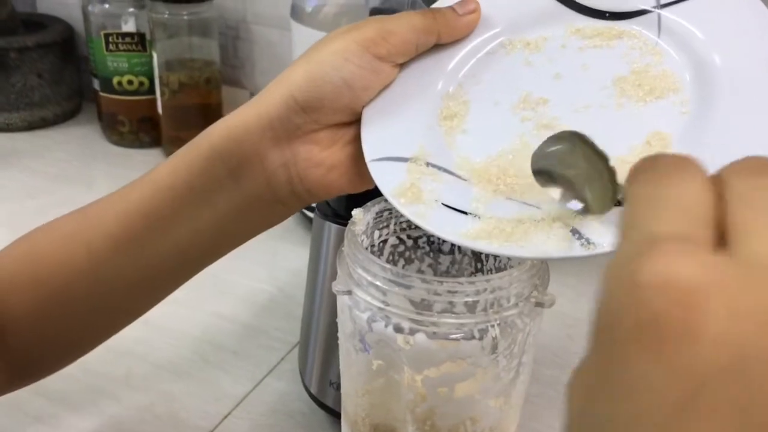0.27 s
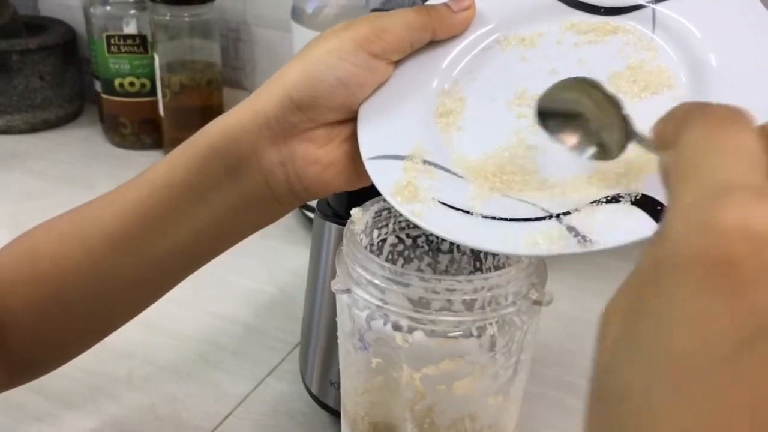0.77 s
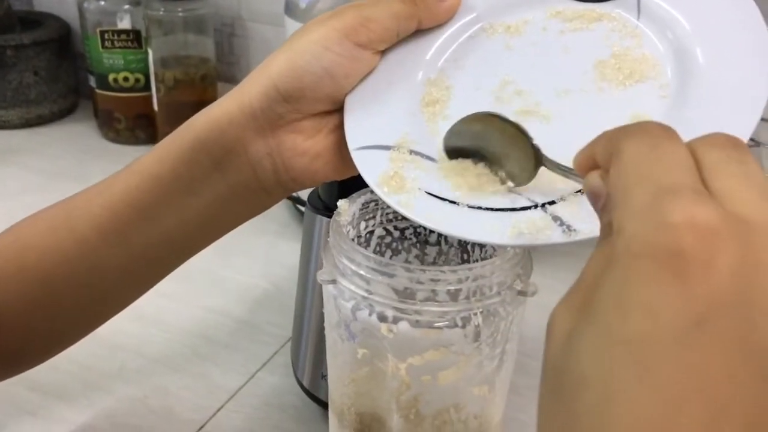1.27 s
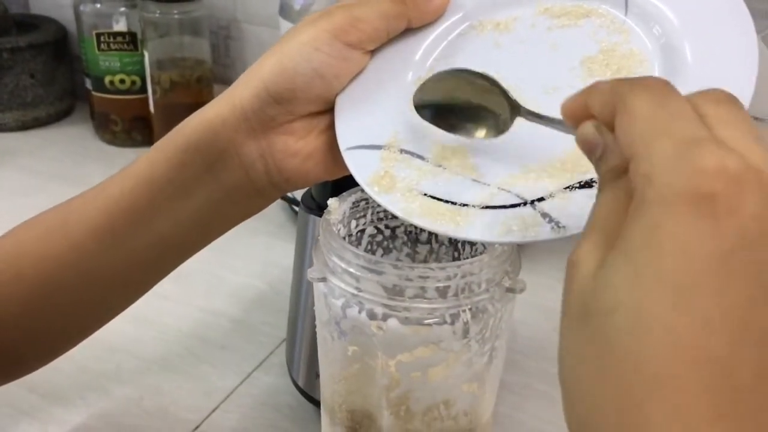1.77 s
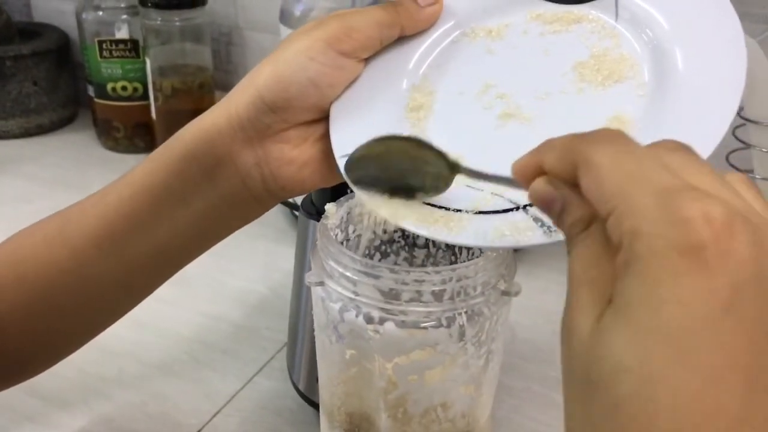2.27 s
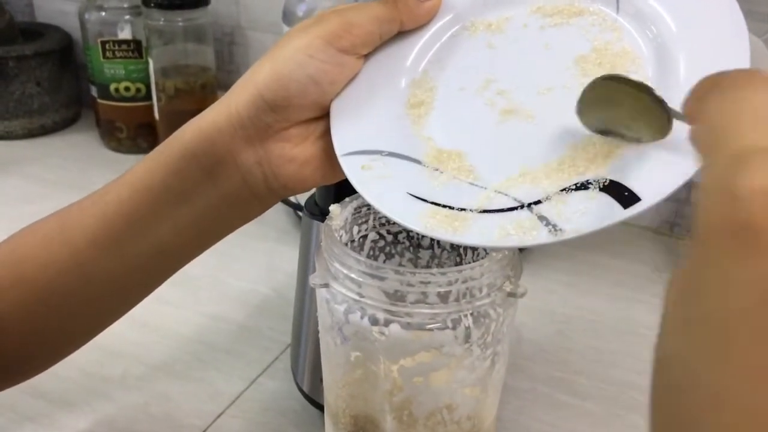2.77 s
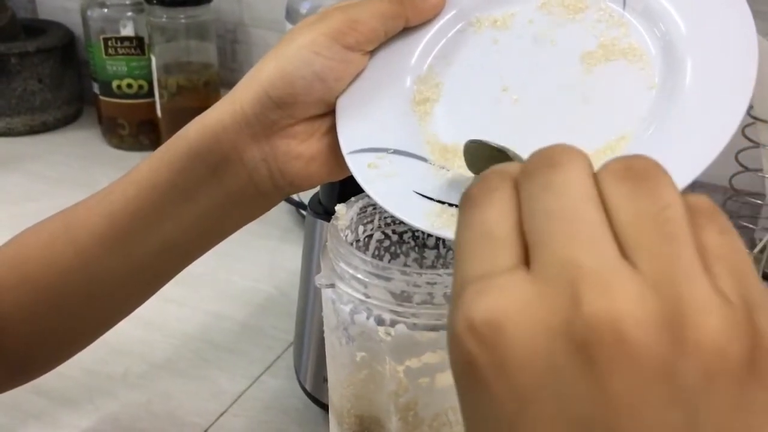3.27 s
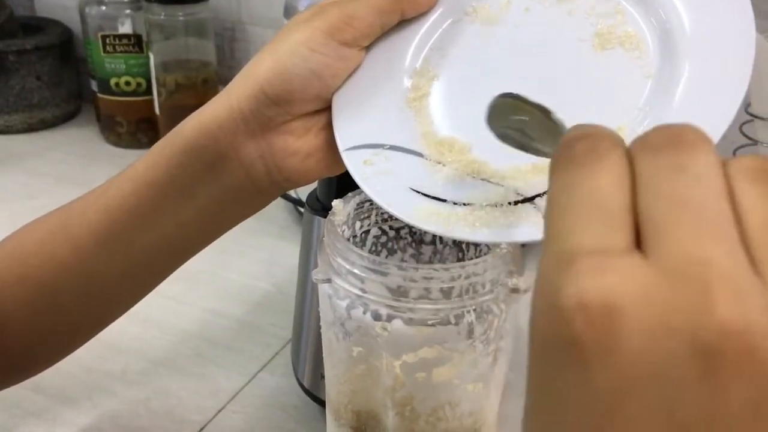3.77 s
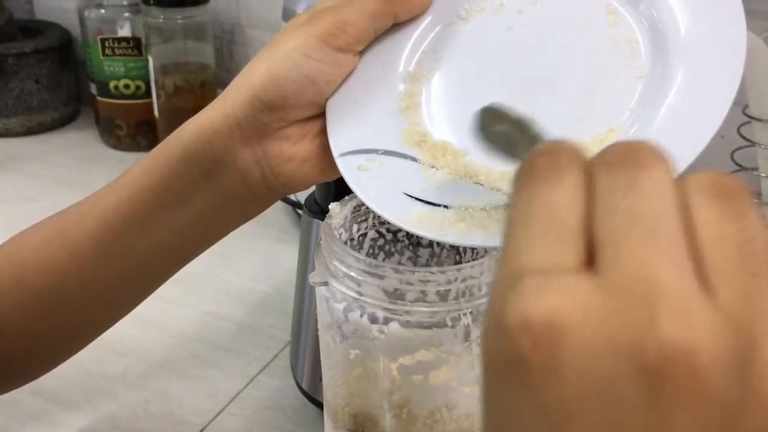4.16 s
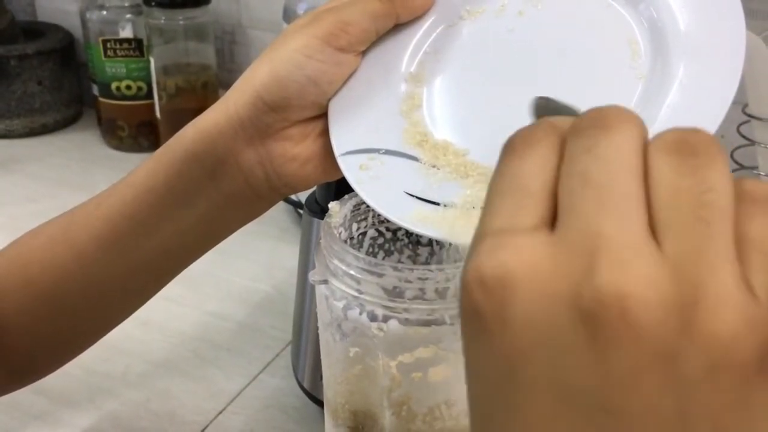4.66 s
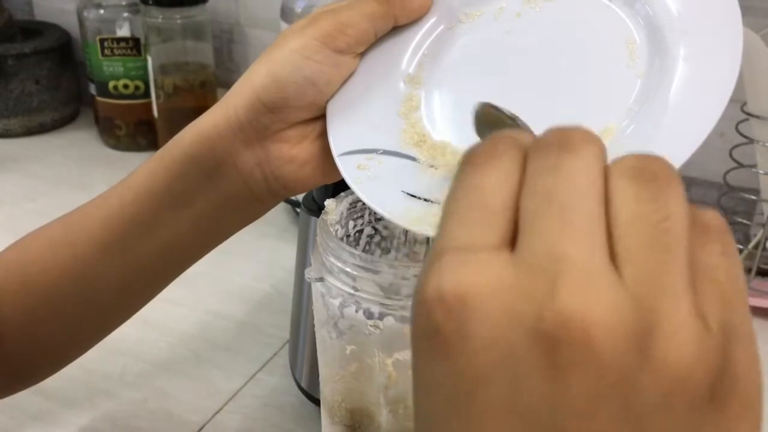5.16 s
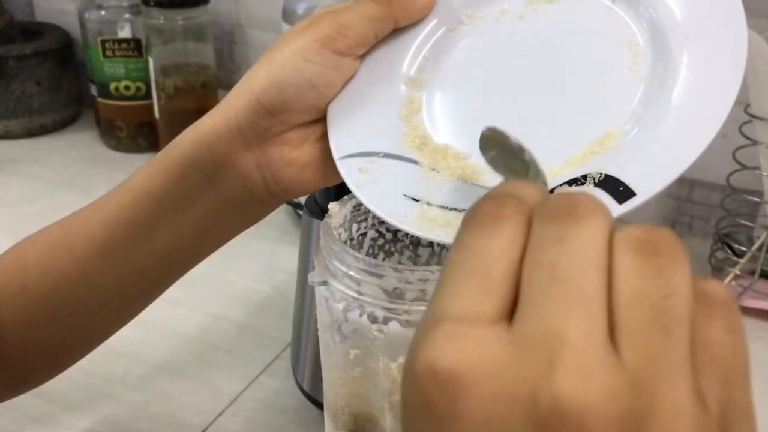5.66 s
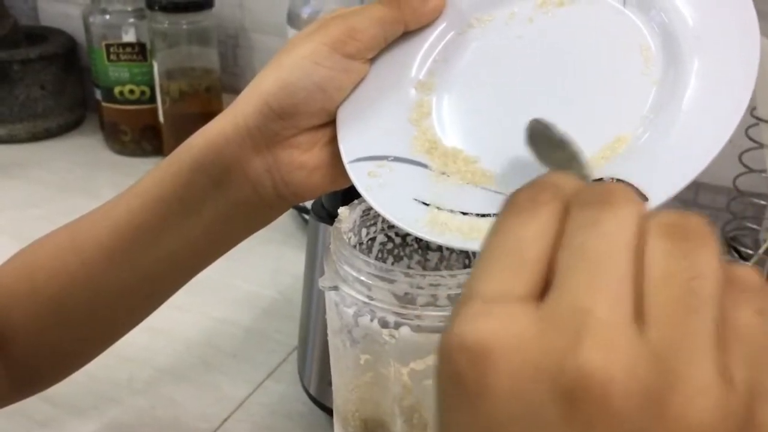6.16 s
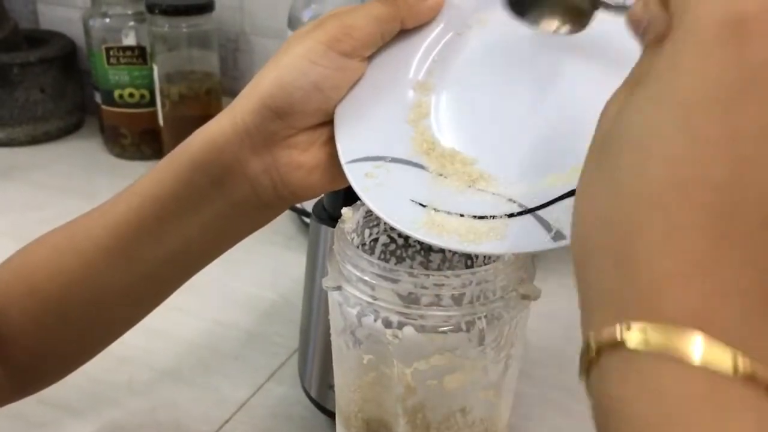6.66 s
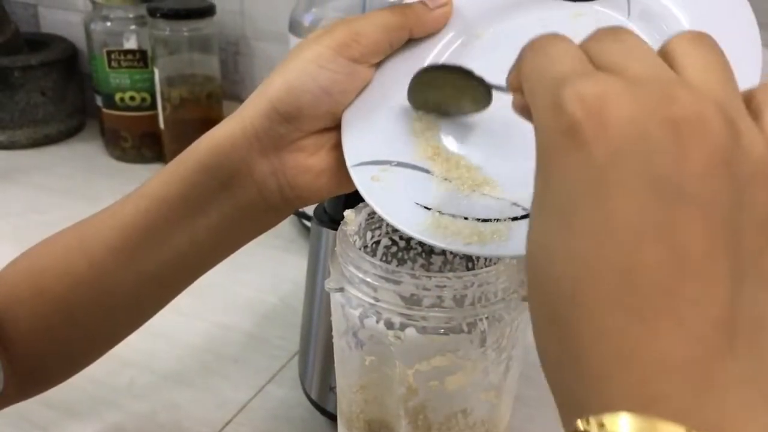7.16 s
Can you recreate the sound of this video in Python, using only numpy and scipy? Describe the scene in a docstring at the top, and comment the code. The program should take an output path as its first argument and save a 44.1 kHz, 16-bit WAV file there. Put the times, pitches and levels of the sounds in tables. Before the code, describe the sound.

Irregular bright spoon clinks and dull plate knocks mix with short grainy scrapes and faint ticking sugar crystals, close up in a lively kitchen.

```python
"""A dull knock and a short clink come first, over low rumble and hiss: a steel spoon pushes sugar off a
hand-held ceramic plate into a blender jar, in a quiet, hard-walled kitchen.
Clinks excite damped modes and a dense crack; scrapes are showers of grain blows, squeaks gliding resonances.
Crystals tick into the jar. The hands damp spoon and plate, so most of the ring that lingers is the room,
made of decaying bands of noise."""
import sys
import numpy as np
from scipy import signal
from scipy.fft import rfft, irfft, next_fast_len
from scipy.io import wavfile

SR = 44100
rng = np.random.default_rng(int(sys.argv[2]) if len(sys.argv) > 2 else 0)


def master(y):
    """Save y as 16-bit WAV."""
    cut = np.clip(np.atleast_2d(y).T, -1, 1)
    pcm = np.round(cut * 32767)  # scale
    wavfile.write(sys.argv[1], SR, pcm.astype(np.int16))


N = 326340
RING = np.arange(int(.1 * SR)) / SR   # time axis of one blow, in seconds

# spoon meets plate: flat it knocks, on edge it ticks; its spot trades a low clack for a high ting; # a few
# faint rows are sugar grains ticking into the jar: start_s, strength_db, knock_db, edge_db, ting_db
TAPS = [(0.1528, 5, 16, 4.5, -11), (0.3199, -12, 11, -6, 3), (0.4059, -7, 15, -5, -5),
        (0.4209, 5, -3.5, -17, -6), (0.602, -30.5, -7, 19, -6), (0.689, -25, -5, 15, 12),
        (0.8055, 24, -8.5, -1.5, 4.5), (0.831, 16, -13.5, -2.5, 6), (1.0224, -11.5, -10, 13, 5),
        (1.2583, -14.5, 6.5, 2, -9), (1.8255, 20.5, -9, -2, 1), (2.0139, 21, -10.5, -5.5, -3.5),
        (2.0329, 6.5, 9.5, -15, -12), (2.044, 9.5, 4.5, -3, -23), (2.2039, -5, 16.5, -13, -4),
        (2.6901, -5.5, 22, -3, -0.5), (2.7269, -2.5, 22, -7, -5.5), (2.7357, 4, 11.5, -9, -12),
        (2.7576, 0, 8.5, -8, 3), (2.7809, 18, -9, -4, 8.5), (2.9163, -16.5, 19, 14, -9),
        (2.963, -5.5, -10, -2, 8.5), (3.015, 6, -5, -5, 2.5), (3.094, -1, 4, 7.5, 7),
        (3.1126, -4, 7, 2, -11.5), (3.1986, 1, -3, 12, 4.5), (3.382, 1, -12, -7, -7),
        (3.4752, 14, -13, -15, -2.5), (3.877, -5.5, 17, 18.5, 3), (3.981, -11, 7, 13.5, -7),
        (4.2904, 9.5, 0, -8.5, -4.5), (4.3415, -3.5, 15, 5, -12), (4.3543, 16, -1, -26, -11),
        (4.359, 16, -6.5, 1, 6), (4.586, -17.5, 0, 10.5, -4), (4.6573, 12.5, 0, -1.5, 2.5),
        (4.754, 0.5, -15, -11, -17), (4.8204, -8.5, 10, -9.5, 4), (4.8767, -18, 0, 17.5, 3),
        (5.205, -9.5, 21.5, 0.5, -1), (5.4268, -10.5, -4.5, 7, -6), (5.6496, -0.5, 12, 4.5, 3),
        (6.0233, 0, 9.5, -17, 6.5), (6.0348, 6.5, 7, -0.5, -6), (6.2052, -15, 23, 14, -1),
        (6.2488, -5.5, 16.5, 6, -2.5), (6.382, -14.5, 0.5, 2.5, -2), (6.6923, 4, 13, -2, -6.5),
        (6.7047, 9, -0.5, 0.5, 8.5), (6.7998, 0.5, 17.5, 12, -14), (6.8032, 9, 1, 12, 5),
        (6.8106, 13, -4, 8, 3.5), (6.9647, 6, -4.5, -2, -5), (7.056, -0.5, 3.5, 4.5, -2)]
# how far each side of a contact reaches over the spectrum: pitch_hz, share
KNOCK_REACH = [(280, 0.85), (400, 1), (1000, 0.95), (2500, 0.47), (3900, 0.076), (5600, 0.16), (13800, .1)]
EDGE_REACH = [(3900, .02), (5600, 0.46), (9200, 0.84), (13800, 1)]
TING_REACH = [(1300, 0.16), (2500, -0.68), (3900, 0.027), (5600, .8), (9200, -0.095)]
# colour of an ordinary tap: pitch_hz, level_db
PLAIN_CONTACT = [(280, -6.5), (1000, -2), (3900, -1.25), (9200, -0.5), (13800, -4)]
# pitches at which the colour of a contact is set: pitch_hz
COLOUR_HZ = np.array([280, 400, 1000, 1300, 2500, 3900, 5600, 9200, 13800])


def taps(level_db=1.5):
    """Clinks and bounces, and a few faint grain ticks: each blow is coloured by how and where it lands."""
    out = np.zeros(N)
    for start_s, strength_db, knock_db, edge_db, ting_db in TAPS:
        contact_db = at_hz(PLAIN_CONTACT, COLOUR_HZ)
        contact_db = contact_db + knock_db * at_hz(KNOCK_REACH, COLOUR_HZ)
        contact_db = contact_db + edge_db * at_hz(EDGE_REACH, COLOUR_HZ)
        contact_db = contact_db + ting_db * at_hz(TING_REACH, COLOUR_HZ)
        clink = coloured(body(), list(zip(COLOUR_HZ, contact_db)))
        add(out, start_s, from_db(strength_db + level_db) * clink)
    return out


# modes of spoon and plate together: pitch_hz, width_hz, peak_db
MODES = [(178, 4.8, -16), (393, 106, -17.5), (602, 47, -14.5), (839.4, 56, -13.5), (1205, 88, -15.5),
         (1221, 99, -28), (1335, 48, -20), (1396, 130, -19), (2310, 72, -32.5), (2520, 68, -15),
         (2596, 5.2, -9.5), (3246, 91, -19), (3633, 57, -13.5), (3829, 66, -9), (4007, 87, -6.5),
         (5273, 24, -31.5), (5504, 260, -11), (5528, 38.5, -11), (6030, 280, -26.5), (6180, 630, -20),
         (7925, 85, -16.5), (8830, 54, -37), (8730, 87, -11.5), (9870, 83, -25), (11880, 200, -18.5),
         (12494, 50, -17.5), (14500, 270, -24), (15700, 222, -36.5)]


def body(spread_db=2.35, detune=0.0039, contact_s=0.0001):
    """One blow on spoon and plate: each spot weighs the modes anew, and the grip shifts them a little."""
    pitch_hz, width_hz, peak_db = np.transpose(MODES)[:, :, None]
    weight, shift = rng.standard_normal((2, len(MODES), 1))
    turns = pitch_hz * (1 + detune * shift) * RING + rng.random((len(MODES), 1))
    # a wide mode dies sooner, so it starts higher to reach its spectral peak
    height = 2 * np.pi * width_hz / SR * from_db(peak_db + spread_db * weight)
    modes = height * np.exp(-np.pi * width_hz * RING) * np.sin(2 * np.pi * turns)
    build_up = 1 - np.exp(-RING / contact_s)
    return (modes.sum(axis=0) + crack()) * build_up


# colour of the dense, heavily damped modes: pitch_hz, level_db
CRACK = [(100, -68), (170, -42.5), (330, -19.5), (480, -47), (620, -22), (1450, -21.5), (1900, -22.5),
         (2900, -26), (4700, -38.5), (6200, -35), (7300, -33), (9000, -22.5), (10600, -32.5),
         (14500, -56.5)]


def crack(t60_s=0.027):
    """Countless damped modes of even strength and random phase, gone within milliseconds."""
    decay = np.exp(-np.log(1000) * RING / t60_s)
    phases = np.angle(rfft(rng.standard_normal(len(RING)) * decay))
    even_burst = irfft(np.exp(1j * phases), len(RING))
    return coloured(unit_energy(even_burst * np.sqrt(decay)), CRACK)


# a firm push shakes the whole plate over the jar: start_s, level_db
THUDS = [(0.153, 23.5), (2.732, 12), (3.091, 21), (3.197, 14), (4.29, 17.5), (6.024, 18), (6.801, 21.5),
         (7.056, 17)]


def thuds(soft_hz=380):
    """Dull thuds: a slow push drives mainly the lowest modes, so each blow is low-passed."""
    out = np.zeros(N)
    for start_s, level_db in THUDS:
        add(out, start_s, from_db(level_db) * body())
    # the tiny offset keeps the filter from stalling on silence
    return signal.sosfilt(signal.butter(2, soft_hz, fs=SR, output="sos"), out + 1e-18)


# spoon drags over sugar: start_s, end_s, strength_db, rasp_db
SCRAPES = [(0.291, 0.362, -17.5, 21), (0.402, 0.453, -1, 4.5), (0.51, 0.585, -15, 1),
           (0.962, 1.132, -20.5, 8.5), (1.182, 1.225, -22.5, 21), (1.408, 1.449, -19, 20),
           (1.47, 1.71, -27, 8), (2.035, 2.05, 10.5, -13), (2.25, 2.343, -10.5, 3.5),
           (2.447, 2.471, -27, 12.5), (3.024, 3.047, -3, -5), (3.084, 3.106, -3.5, 15.5),
           (3.193, 3.204, 6.5, -1.5), (3.204, 3.374, -9, -11), (3.385, 3.485, -7, -9.5),
           (3.475, 3.476, 8, -15), (3.582, 3.907, -27, -11), (3.956, 3.997, -11, 17),
           (4.029, 4.237, -25, -19), (4.806, 4.993, -13.5, 5), (5.138, 5.17, -11.5, -5.5),
           (5.258, 5.387, -15.5, 15.5), (5.704, 5.764, -18, 14.5), (6.108, 6.205, -20, 7),
           (6.22, 6.277, -9.5, 16), (6.749, 6.83, -2.5, -17), (6.825, 6.888, -2, 7),
           (6.966, 7.142, -6.5, -1.5), (7.126, 7.337, -21, -3)]
# how far rasp and hiss reach over the spectrum: pitch_hz, share
RASP_REACH = [(400, 0.9), (1300, 0.83), (3900, .02)]
HISS_REACH = [(3900, .02), (9200, 0.46), (13800, 1)]
# a light touch skates over the crystals and hisses; a heavy one crushes them and sounds darker
HISS_EVEN_DB, HISS_PER_DB = -12, .5   # strength of a neutral drag; hiss gained for each dB lighter


def scrapes(grains_per_s=900, grain_spread_db=5.0, judder_db=6.0, judder_rate=110, taper=0.2,
            ring_db=-4.0, count=3):
    """Sugar crushed at a few points: each grain is a tiny blow on the plate and a dry tick of its own."""
    out = np.zeros(N)
    tick = crystal_ticks(1.0 * (RING == 0))
    for start_s, end_s, strength_db, rasp_db in SCRAPES:
        size = int(max(end_s - start_s, .01) * SR)
        pressure = signal.windows.tukey(size, taper) * from_db(judder_db * wander(size, judder_rate))
        drag = 0
        for point in range(count):
            force = unit_energy(pressure * grains(size, grains_per_s, grain_spread_db))
            drag = drag + signal.fftconvolve(force, from_db(ring_db) * body() + tick)
        # strength counts like one tap in every hundredth of a second
        gain = from_db(strength_db) * np.sqrt(100 * size / SR / count)
        hiss_db = HISS_PER_DB * (HISS_EVEN_DB - strength_db)
        contact_db = rasp_db * at_hz(RASP_REACH, COLOUR_HZ) + hiss_db * at_hz(HISS_REACH, COLOUR_HZ)
        add(out, start_s, gain * coloured(drag, list(zip(COLOUR_HZ, contact_db))))
    return out


def grains(size, per_s, spread_db):
    """Grains give way at random moments: clicks of uneven size and random sign, with energy 1."""
    chance, sign = rng.random((2, size))
    size_db = spread_db * np.minimum(rng.exponential(1, size), 4)
    return unit_energy((chance < per_s / SR) * np.sign(sign - .5) * from_db(size_db))


# the edge sticks and slips, and its resonance glides as the spoon moves:
# start_s, end_s, first_hz, last_hz, level_db
SQUEAKS = [(0.401, 0.424, 1157, 1330, -49), (0.962, 1.061, 2005, 1760, -64),
           (1.537, 1.664, 822, 785, -72.5), (2.268, 2.502, 835, 787, -70),
           (3.015, 3.077, 1916, 1420, -58.5), (3.205, 3.381, 5770, 3470, -71),
           (3.379, 3.401, 2496, 2620, -48), (3.427, 3.474, 2800, 2450, -51.5),
           (6.824, 6.997, 6240, 4660, -64), (7.013, 7.13, 3990, 2860, -60), (7.182, 7.312, 2376, 2310, -67)]


def squeaks(width_share=.26, judder_db=5.5, judder_rate=90):
    """Irregular slips keep a gliding resonance going; its strength and phase wander as fast as it is wide."""
    out = np.zeros(N)
    for start_s, end_s, first_hz, last_hz, level_db in SQUEAKS:
        size = int(max(end_s - start_s, .01) * SR)
        phase = 2 * np.pi * np.cumsum(np.linspace(first_hz, last_hz, size)) / SR
        width_hz = width_share * first_hz
        slips = wander(size, width_hz) + 1j * wander(size, width_hz)
        pressure = signal.windows.tukey(size, .5) * from_db(judder_db * wander(size, judder_rate))
        squeak = pressure * np.real(slips * np.exp(1j * phase))
        add(out, start_s, from_db(level_db) * squeak)
    return out


def falling_sugar(per_s=14, spread_db=4.0, smallest_db=-24, lowest_hz=3000):
    """Loose crystals of uneven size drop into the jar at random moments with tiny, dry ticks."""
    size_db = spread_db * np.minimum(rng.exponential(1, N), 3)
    drops = (rng.random(N) < per_s / SR) * from_db(smallest_db + size_db)
    return high_pass(crystal_ticks(drops), lowest_hz)


# the dry tick of a crystal breaking: pitch_hz, level_db
CRUNCH = [(300, -38), (1400, -26), (3200, -28.5), (7000, -26), (12000, -35), (15000, -43.5)]


def crystal_ticks(clicks):
    """Give each click the short, dry colour of a sugar crystal."""
    return coloured(clicks, CRUNCH)


def kitchen(x, count=6):
    """Hand and plate keep moving, so each stretch of the work meets a different pattern of echoes."""
    out = np.zeros(N)
    for stretch in np.array_split(np.arange(N), count):
        add(out, stretch[0] / SR, signal.fftconvolve(x[stretch], echo()))
    return out


# the echo dies fastest at the extremes of pitch: pitch_hz, t60_s
ROOM_T60 = [(150, .42), (1000, .55), (2500, .56), (5000, .52), (9000, .46), (15000, .38)]
# strength of the echo against the direct sound: pitch_hz, level_db
ROOM_DB = [(150, 6.5), (600, -12), (1500, 0.5), (2600, -2.5), (4000, -5.5), (8500, -8), (15000, -9.5)]


def echo(first_echo_s=0.0018, early_db=3.0, early_s=0.016):
    """Answer to a click: strongest just after counter and wall reply; each band dies at its own rate."""
    t = np.arange(int(.6 * SR)) / SR
    hz = np.fft.rfftfreq(len(t), 1 / SR)
    centres = np.geomspace(150, 15000, 10)
    white = rfft(rng.standard_normal(len(t)))
    # the echo fades in around first_echo_s
    arrival = np.clip(t / first_echo_s - .5, 0, 1)
    onset = arrival * (1 + from_db(early_db) * np.exp(-t / early_s) / 2)
    out = 0
    # each row of the identity picks one band, overlapping its neighbours
    for centre, share in zip(centres, np.eye(len(centres))):
        band = irfft(white * at_hz(list(zip(centres, share)), hz), len(t))
        decay = unit_energy(onset * np.exp(-np.log(1000) * t / at_hz(ROOM_T60, centre)))
        out = out + band * decay * from_db(at_hz(ROOM_DB, centre))
    return out


# colour of still air and microphone hiss: pitch_hz, relative level_db per Hz
FLOOR = [(15, -33), (25, -0.5), (123, 1), (223, -4.5), (309, -6.5), (516, -14), (607, -11.5), (714, -16.5),
         (3820, -24.5), (4870, -29.5), (5570, -27), (8830, -27), (14000, -30.5), (16000, -29.5)]


def floor(level_db=-65.5):
    """Low room rumble and hiss: coloured noise at a steady RMS level."""
    noise = coloured(rng.standard_normal(N), FLOOR)
    return from_db(level_db) * np.sqrt(N) * unit_energy(noise)


def from_db(db):
    """Decibels to amplitude."""
    return 10 ** (np.asarray(db) / 20)


def at_hz(points, hz):
    """Read a table of pitch_hz, value on a log-frequency axis."""
    known_hz, values = np.transpose(points)
    return np.interp(np.log(np.maximum(hz, 1)), np.log(known_hz), values)


def unit_energy(x):
    """Scale a sound to energy 1."""
    return x / np.sqrt(np.sum(x ** 2) + 1e-20)


def add(track, start_s, sound):
    """Mix a sound into the track at start_s."""
    start = max(round(start_s * SR), 0)
    track[start:start + len(sound)] += sound[:N - start]


def coloured(x, points):
    """Causal (minimum-phase) filter with the gains pitch_hz, level_db."""
    size = 2 * next_fast_len(len(x) // 2 + len(RING) // 2)
    gain = from_db(at_hz(points, np.fft.rfftfreq(size, 1 / SR)))
    # folding the cepstrum onto positive times puts the energy as early as possible
    cepstrum = irfft(np.log(gain))
    cepstrum[1:size // 2] *= 2
    cepstrum[size // 2 + 1:] = 0
    return irfft(rfft(x, size) * np.exp(rfft(cepstrum)))[:len(x)]


def wander(size, rate):
    """Straight lines between random heights of spread 1, `rate` of them a second."""
    knots = rng.standard_normal(size // 2)
    return np.interp(np.arange(size) * rate / SR, np.arange(len(knots)), knots)


def high_pass(x, hz):
    """Second-order cut of everything below hz."""
    return signal.sosfilt(signal.butter(2, hz, "high", fs=SR, output="sos"), x)


def scene(radiation_hz=130):
    """Spoon, plate and sugar, heard close by in the kitchen."""
    # a thing as small as a plate radiates little bass
    plate = high_pass(taps() + thuds() + scrapes() + squeaks(), radiation_hz)
    work = plate + falling_sugar()
    return (work + kitchen(work) + floor())[None]


def record(dry, cutoff_hz=15700):
    """The top is cut steeply by an elliptic low-pass."""
    return signal.sosfilt(signal.ellip(10, .1, 80, cutoff_hz, fs=SR, output="sos"), dry)


dry = scene()
out = record(dry)
master(out)
```